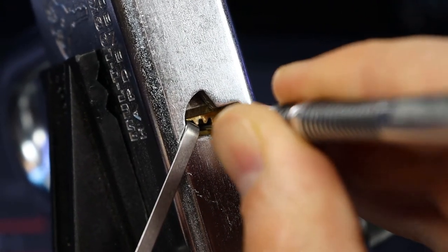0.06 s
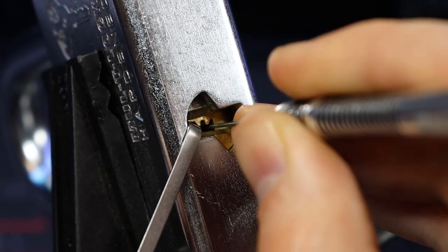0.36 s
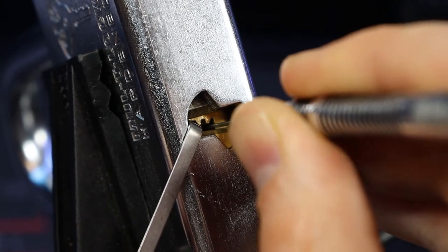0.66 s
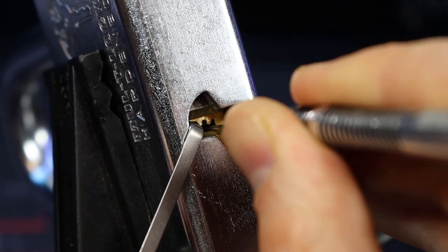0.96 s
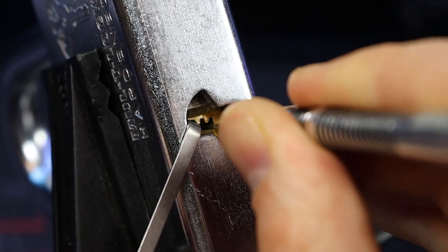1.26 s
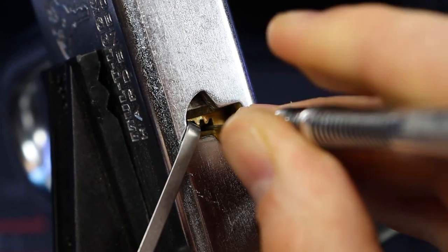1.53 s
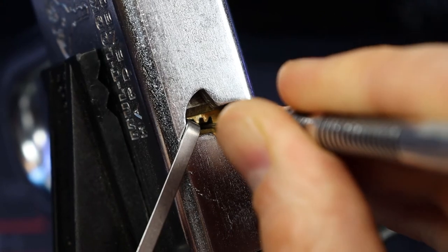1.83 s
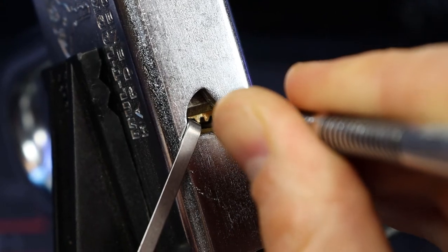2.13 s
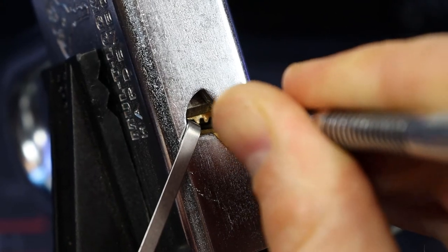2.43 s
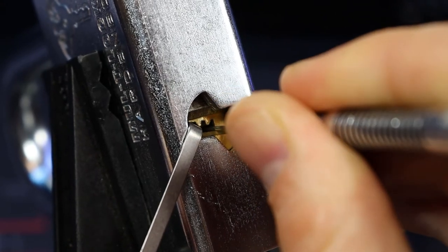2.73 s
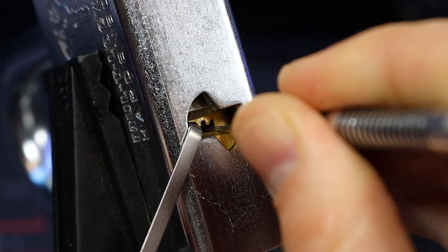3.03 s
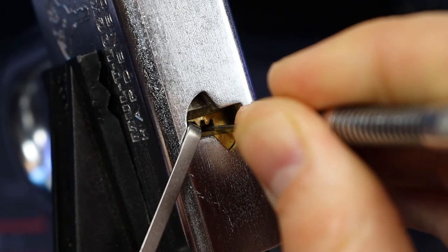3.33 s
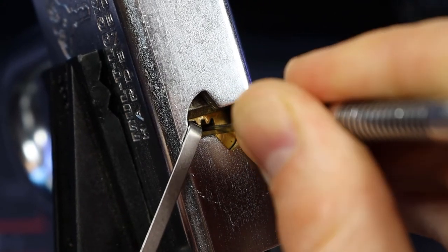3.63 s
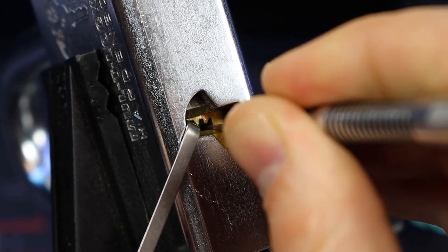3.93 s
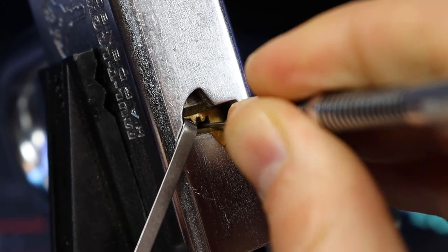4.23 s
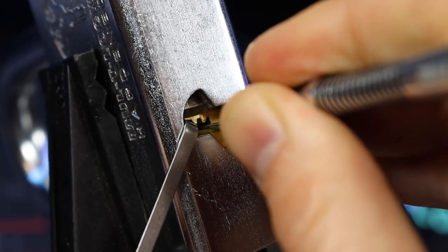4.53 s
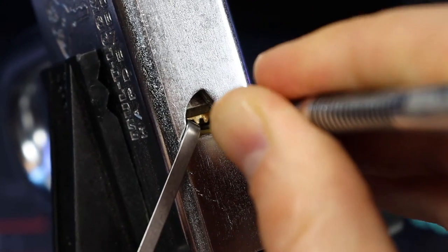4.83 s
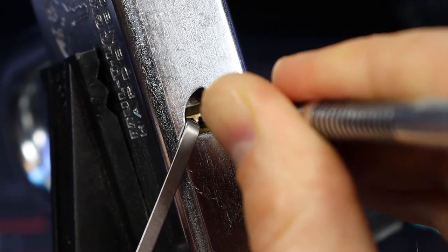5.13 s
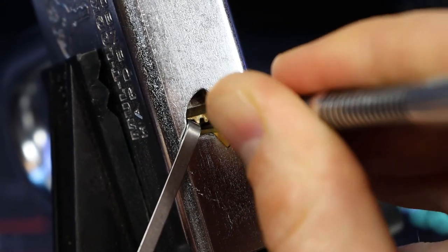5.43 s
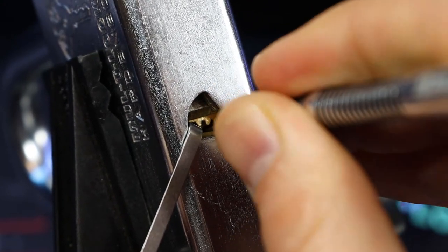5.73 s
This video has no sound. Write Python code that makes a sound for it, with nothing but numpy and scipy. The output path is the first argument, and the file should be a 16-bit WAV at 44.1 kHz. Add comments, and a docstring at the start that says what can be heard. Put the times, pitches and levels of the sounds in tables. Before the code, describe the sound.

A steel pick snaps and ticks the pins of a brass lock, with pauses, in a quiet, faintly humming room.

```python
"""Picking a brass lock

A steel pick works the pins of a lock clamped in a vice, close up in a small room. Pins snap and tick
against their stops, briefly ringing the lock, and the pick rasps faintly along the keyway.
Behind it a fan hums over room air, a deep drone and a thin hiss; a low rumble swells once and fades."""
import sys
import numpy as np
from scipy import signal
from scipy.fft import rfft, irfft
from scipy.io import wavfile
from scipy.ndimage import map_coordinates

SR = 44100
rng = np.random.default_rng(int(sys.argv[2]) if len(sys.argv) > 2 else 0)


def unload_wav(signal):
    """Save mono or channel-first audio to the path in sys.argv[1] as 16-bit WAV at rate SR, clipped to [-1, 1]."""
    wavfile.write(
        sys.argv[1],
        SR,
        np.round(np.clip(np.atleast_2d(signal).T, -1, 1) * 32767).astype(np.int16),
    )


N = 263718
TIME = np.arange(N) / SR


def undb(db):
    """Decibels to gain."""
    return 10 ** (np.asarray(db) / 20)


def unit_rms(x):
    """Scale to an rms of one."""
    return x / np.sqrt(np.mean(x ** 2))


def unit_energy(x):
    """Scale each channel to unit energy."""
    return x / np.linalg.norm(x, axis=-1, keepdims=True)


def pan(db):
    """Stereo gains for a left-minus-right level difference."""
    return undb(np.array([[db], [-db]]) / 2)


def colour(x, curve):
    """Equalise along a curve of (frequency [Hz], gain [dB]) points."""
    hz, db = np.transpose(curve)
    bins_hz = np.maximum(np.fft.rfftfreq(x.shape[-1], 1 / SR), 1)
    gain = undb(np.interp(np.log(bins_hz), np.log(hz), db))
    return irfft(rfft(x) * gain, x.shape[-1])


def band(x, low_hz, high_hz, order=4):
    """Band-pass filter."""
    return signal.sosfilt(signal.butter(order, [low_hz, high_hz], "band", fs=SR, output="sos"), x)


def noise(curve):
    """Coloured noise with an rms of one."""
    return unit_rms(colour(rng.standard_normal(N), curve))


def drift(rate):
    """A smooth random curve through rate points a second, with a spread near one."""
    return map_coordinates(rng.standard_normal(1024), [TIME * rate], order=3, mode="wrap")


def decay(t, t60):
    """Die away by 60 dB in t60 seconds."""
    return np.exp(-np.log(1000) * t / t60)


# Fan and mains tones: (frequency [Hz], level [dB], waver depth [ratio], left minus right [dB])
FAN_TONES = [(120, -65.5, 0.26, 4.5), (186.5, -65, 0.92, 0.5), (223.2, -59, 0.8, 7), (255, -66.5, .9, 9.5),
             (274.9, -61, .9, 1), (391.5, -56.5, 0.2, -1), (972, -67.5, .35, 11.5), (1293, -69, 0.35, 0.5),
             (1566, -65, .15, 0.5)]
def fan(waver_rate=7, diffuse_hz=1100):
    """The fan's wavering hum; the room puts the higher tones out of step between the ears."""
    out = 0
    for hz, db, depth, pan_db in FAN_TONES:
        waver = 1 + depth * (drift(waver_rate) + 1j * drift(waver_rate))  # in level and phase
        ear_phase = np.array([[0], [min(hz / diffuse_hz, 1) * np.pi / 2]])
        phase = 2 * np.pi * (hz * TIME + rng.random()) + ear_phase
        tone = np.real(waver * np.exp(1j * phase))
        out = out + unit_rms(tone) * undb(db) * pan(pan_db)
    return out


# Swells of the drone above its resting level: (centre [s], half length [s], level [dB])
SWELLS = [(0.48, 0.3, -55.5), (1.623, 0.2, -52), (2.42, 0.32, -55), (4.05, 0.35, -57)]
def drone(hz=42, wander_hz=2, waver_db=2.5, rest_db=-62):
    """A deep, centred tone that wanders in pitch and level and swells now and then."""
    pitch_hz = hz + wander_hz * drift(2.4)
    tone = np.sin(2 * np.pi * np.cumsum(pitch_hz) / SR) * undb(waver_db * drift(16))
    swells = sum(undb(db) * np.exp(-((TIME - centre) / half) ** 2) for centre, half, db in SWELLS)
    return unit_rms(tone) * np.hypot(swells, undb(rest_db))


# Room tone common to both ears: (frequency [Hz], gain [dB])
AIR_MID_EQ = [(25, -19), (40, -9.5), (75, -2), (105, -4.5), (290, 0.5), (480, -6.5), (850, -6.5),
              (1250, -15.5), (2300, -18), (3300, -25), (6000, -31.5), (12000, -36), (15500, -43.5)]
# Room tone that differs between the ears: (frequency [Hz], gain [dB])
AIR_SIDE_EQ = [(25, -13), (60, -10.5), (100, -6.5), (280, -7.5), (500, -3), (950, 1.5), (1400, -7.5),
               (2300, -5), (3300, -13), (6000, -19.5), (12000, -22), (15500, -22.5)]
def air(mid_db=-50, side_db=-57, drift_db=0.5):
    """A steady bed of room air, centred in the bass and diffuse above."""
    mid = undb(mid_db + drift_db * drift(3.25)) * noise(AIR_MID_EQ)
    side = undb(side_db) * noise(AIR_SIDE_EQ)
    return np.array([mid + side, mid - side])


def hiss(hz=14350, width_hz=800, db=-70, stereo_db=-7):
    """A thin band of hiss from the microphone's electronics, mostly common to both channels."""
    white = rng.standard_normal(N) + undb(stereo_db) * rng.standard_normal((2, N))
    peak = signal.iirpeak(hz, hz / width_hz, fs=SR)
    return undb(db) * unit_rms(signal.lfilter(*peak, white))


# Modes of the lock and pick, damped by vice and fingers: (frequency [Hz], level [dB], t60 [s])
LOCK_MODES = [ (2340, -14, 0.011), (2670, -8.5, 0.0083), (2970, -12, 0.023), (3330, -10.5, 0.013),
              (3800, -11, 0.016), (4870, -13, .006), (5370, -11.5, .007), (7560, -10, 0.009),
              (8280, -10, .008), (8440, -12.5, 0.012), (9130, -2, 0.012), (9320, -4.5, 0.016),
              (9750, -13, 0.0082), (10800, -9, 0.0044), (11200, -8.5, 0.0077), (13200, -2, .007),
              (13400, -9, .007), (14100, 7, 0.0078), (15200, -8, 0.0074), (14500, 3, 0.0062), ]
def lock_ring(t, pin_hz, pin_db=-7, pin_t60=0.018, detune=0.004, ear_phase_rad=0.77):
    """Lock, pick and struck pin ring together as fast-dying partials."""
    hz, db, t60 = np.transpose(LOCK_MODES + [(pin_hz, pin_db, pin_t60)])[:, :, None]
    hz = hz * (1 + detune * rng.standard_normal(hz.shape))  # the grip shifts from hit to hit
    # neighbouring modes radiate differently and lead in opposite ears
    lead = ear_phase_rad * (-1) ** np.arange(len(hz))[:, None]
    partials = undb(db) * decay(t, t60) * np.sin(2 * np.pi * hz * t + np.array([lead, -lead]))
    return unit_energy(partials.sum(axis=1))


# Tone of the contact crack: (frequency [Hz], gain [dB])
CRACK_EQ = [(100, -24.5), (1500, -24.5), (2700, 4.5), (4900, 0.5), (6000, -14), (8500, 6), (12000, -2.5),
            (15500, -3.5)]
def crack(t, db=-3, t60=0.0091):
    """Metal meets metal in a broad, dying burst of stereo noise."""
    burst = colour(rng.standard_normal((2, len(t))), CRACK_EQ) * decay(t, t60)
    return undb(db) * unit_energy(burst)


def knock(t, hz=480, db=-24.5, t60=0.0016):
    """The whole lock jolts in the vice: one heavily damped swing."""
    return undb(db) * unit_energy(np.cos(2 * np.pi * hz * t) * decay(t, t60))


def snap(body_db, edge_db, pin_hz, rebound_s, rebound_db):
    """A pin hits its stop and rebounds once: ring and crack on both contacts, over one knock."""
    t = np.arange(SR // 16) / SR
    ring = lock_ring(t, pin_hz)
    strike = ring + crack(t)
    rebound = np.pad(ring + crack(t), ((0, 0), (int(rebound_s * SR), 0)))[:, :len(t)]
    hit = strike + undb(rebound_db) * rebound
    # where and how hard the pin lands sets body and bright edge: (level [dB], from [Hz], to [Hz])
    bands = ((body_db, 2100, 5800), (0, 5800, 11000), (edge_db, 11000, 17000))
    metal = sum(undb(db) * unit_energy(band(hit, low, high)) for db, low, high in bands)
    return metal + knock(t)


# Pin hits, from faint ticks to hard snaps: (time [s], level [dB], body [dB], bright edge [dB],
# pin ring [Hz], left minus right [dB], rebound [dB])
PIN_HITS = [(0.1705, -36, -1, -1, 2930, -5, -8), (0.2095, -31.5, 4, -13, 4840, -1, -4),
            (0.3008, -15.5, 3, -3, 5100, -4, -21), (0.4334, -40, 7, -14.6, 2930, -6, -5),
            (0.767, -33, 1.5, -18, 4050, -5, 5), (1.004, -41, -1, -1, 2830, -1, -12),
            (1.0889, 6, -3, -4, 2760, -2, -13), (3.1667, -45, 18.5, -8.5, 2340, -3, -2),
            (3.6562, -48, 15.5, -3, 2860, -1.2, 1.5), (3.801, -40, 11.5, -3, 2950, -1, -15),
            (4.1421, -7, -1.5, -6, 8860, -2.5, -15), (4.4893, -38, 2, -10.3, 2970, -2, -8),
            (4.505, -32.5, 1, -4, 2660, -4, -14), (4.5526, -33, 2.5, -2, 5400, -3.8, -15),
            (4.9727, -13.5, -8, -4, 2650, -3.5, -11), (5.2638, -19.5, -5, 0, 5460, -2.3, -12),
            (5.3869, -18, -2, -2, 3000, -1, 11), (5.4391, 10.5, -11, -3.5, 2756, -0.3, -25),
            (5.937, -30, -1, -1, 2900, -3.1, 1)]
def pins(rebound_at_0db_s=0.0007, doubling_db=36):
    """The pins click one after another; the harder the hit, the sooner it rebounds."""
    out = np.zeros((2, N + SR))
    for time, db, body_db, edge_db, pin_hz, pan_db, rebound_db in PIN_HITS:
        rebound_s = rebound_at_0db_s * 2 ** (-db / doubling_db)
        hit = snap(body_db, edge_db, pin_hz, rebound_s, rebound_db)
        start = int(time * SR)
        out[:, start:start + hit.shape[1]] += hit * pan(pan_db) * undb(db)
    return out[:, :N]


# The rumble's bass-heavy tone: (frequency [Hz], gain [dB])
RUMBLE_EQ = [(35, -21.5), (54, -10.5), (67, 9), (90, -7), (145, -5), (260, -8), (450, -31.5), (1500, -26),
             (6000, -61.5)]
def rumble(peak_s=3.15, peak_db=-46, fall_3db_s=0.11, approach_stretch=1.67):
    """A low rumble passes like something distant, coming more slowly than it goes."""
    width_s = fall_3db_s * np.where(TIME < peak_s, approach_stretch, 1)
    distance = np.hypot(1, (TIME - peak_s) / width_s)
    return undb(peak_db) * noise(RUMBLE_EQ) / distance


def pressure(start, hold, attack_s=0.046, release_s=0.09):
    """Pressure of one pick stroke: it builds, holds and lets go."""
    rise = (TIME - start) / attack_s
    fall = 1 - (TIME - start - attack_s - hold) / release_s
    return np.clip(np.minimum(rise, fall), 0, 1)


# Tone of the pick's rasp: (frequency [Hz], gain [dB])
RASP_EQ = [(1000, -10.5), (3000, -1), (5200, -1), (6600, -8), (7450, 0.5), (8300, -13), (10000, -7),
           (11500, -5), (15500, -21)]
# Strokes along the keyway: (start [s], hold [s], rasp [dB], singing blade [dB])
PICK_STROKES = [(3.06, 0.072, -64.5, -73), (3.26, 0.28, -70, -82), (3.99, 0.085, -68, -67.5)]
def pick(rest_db=-75.5, grain_db=1.5, grain_rate=130, blade_hz=(8900, 10100)):
    """Steel rubs on brass with a faint, grainy rasp; under load the blade sings."""
    rubbing = sum(undb(db) * pressure(start, hold) for start, hold, db, _ in PICK_STROKES)
    singing = sum(undb(db) * pressure(start, hold) for start, hold, _, db in PICK_STROKES)
    rubbing = np.hypot(rubbing, undb(rest_db))  # the pick never lies quite still
    rasp = np.array([noise(RASP_EQ) for _ in range(2)]) * rubbing
    blade = unit_rms(band(rng.standard_normal((2, N)), *blade_hz, order=2)) * singing
    return (rasp + blade) * undb(grain_db * drift(grain_rate))


# Tone of the reflections: (frequency [Hz], gain [dB])
ECHO_EQ = [(300, 2), (1500, 2.5), (3000, 2), (5500, 0), (7500, 0.5), (9000, 2.5), (10500, -3.5),
           (12500, -0.5), (15500, -1.5)]
def room(x, bench=(-14, 0.035, 0.0024), walls=(-18, 0.202, 0.0026)):
    """Vice and bench scatter the sound at once; the walls add a short tail."""
    t = np.arange(SR // 2) / SR
    out = x
    for db, t60, predelay_s in (bench, walls):
        scatter = colour(rng.standard_normal((2, len(t))), ECHO_EQ)
        echo = unit_energy(scatter * decay(t, t60) * (t > predelay_s))
        out = out + undb(db) * signal.fftconvolve(x, echo, axes=1)[:, :N]
    return out


def scene():
    """Pins and pick up front in the small room, over the quiet background."""
    return room(pins() + pick()) + fan() + drone() + air() + rumble() + hiss()


def record(dry, top_hz=15800):
    """Peaks over full scale clip, then a steep low-pass cuts the very top."""
    low_pass = signal.ellip(8, 0.2, 70, top_hz, fs=SR, output="sos")
    return signal.sosfilt(low_pass, np.clip(dry, -1, 1))


dry = scene()
out = record(dry)
unload_wav(out)
```